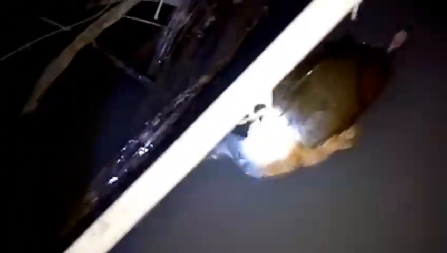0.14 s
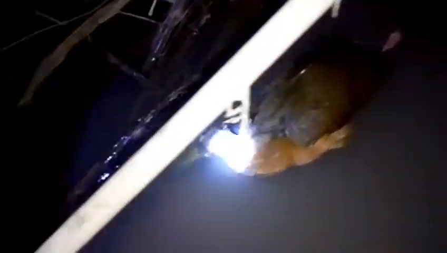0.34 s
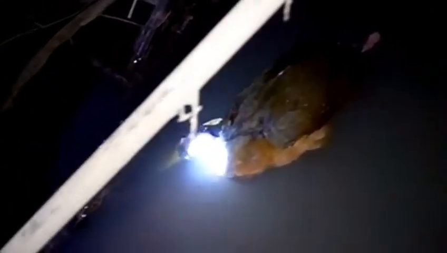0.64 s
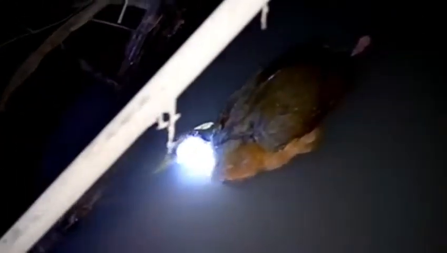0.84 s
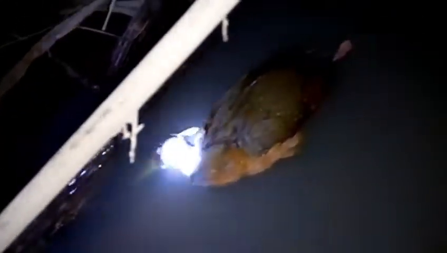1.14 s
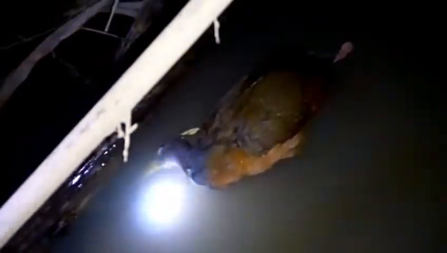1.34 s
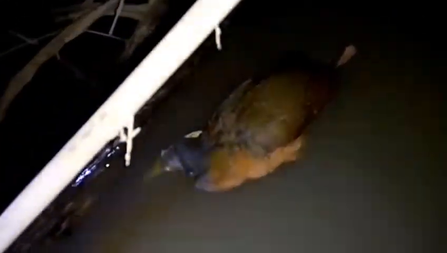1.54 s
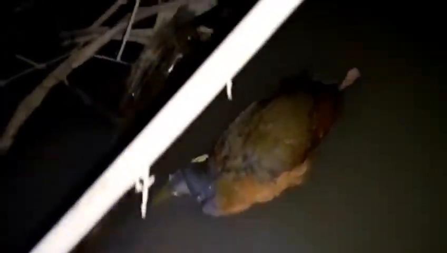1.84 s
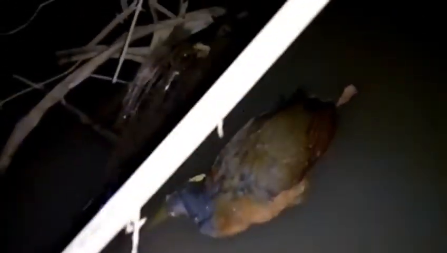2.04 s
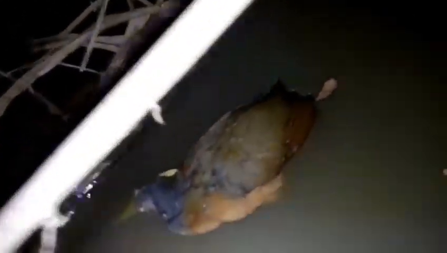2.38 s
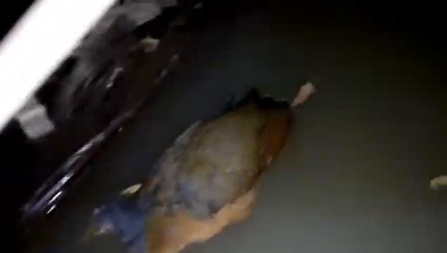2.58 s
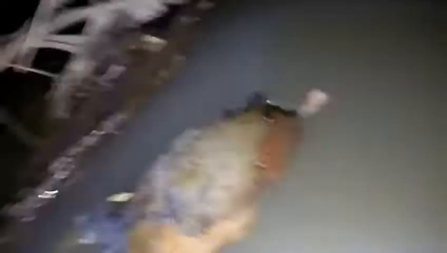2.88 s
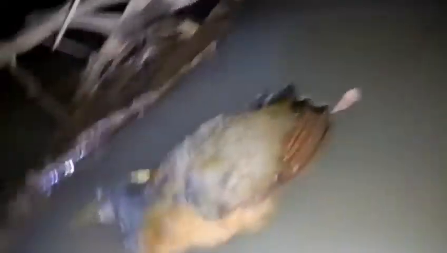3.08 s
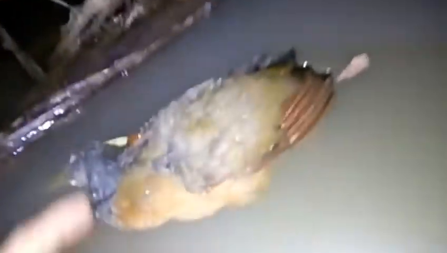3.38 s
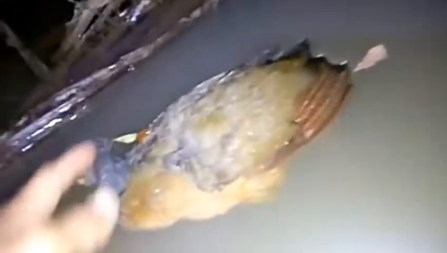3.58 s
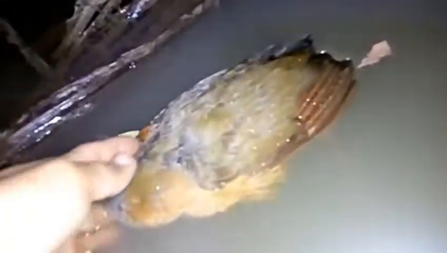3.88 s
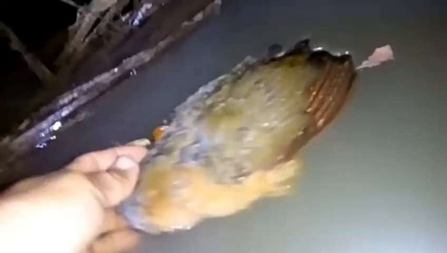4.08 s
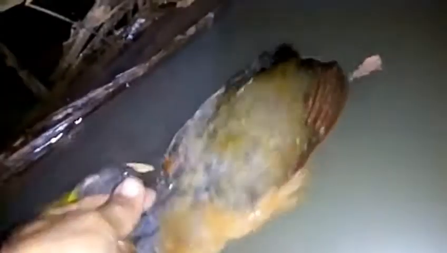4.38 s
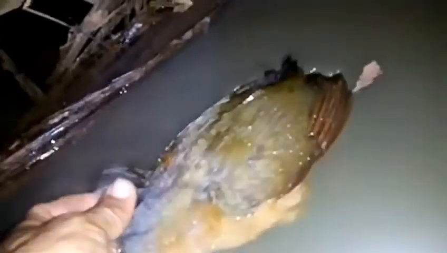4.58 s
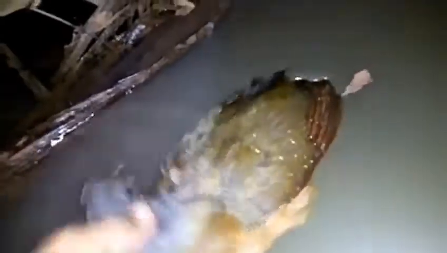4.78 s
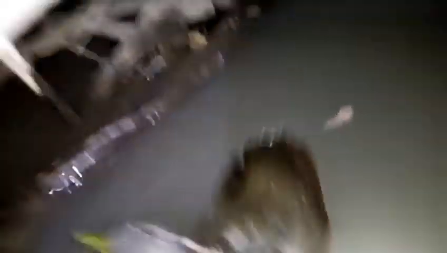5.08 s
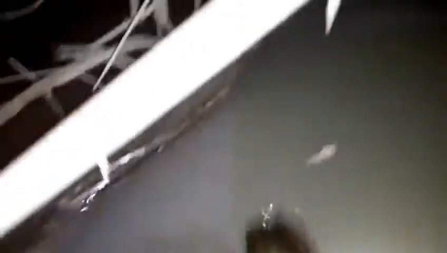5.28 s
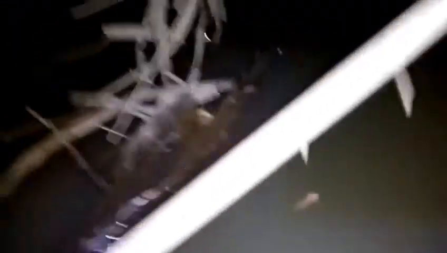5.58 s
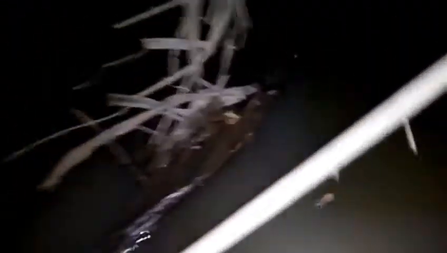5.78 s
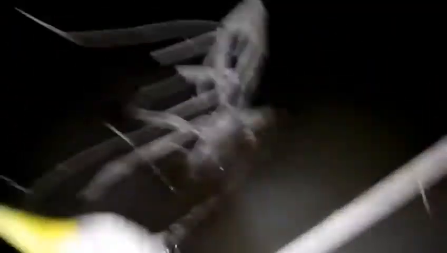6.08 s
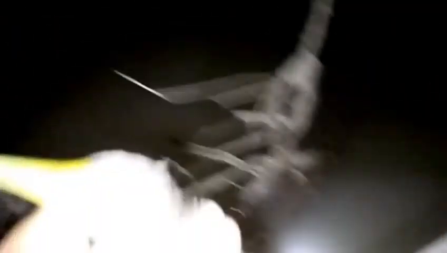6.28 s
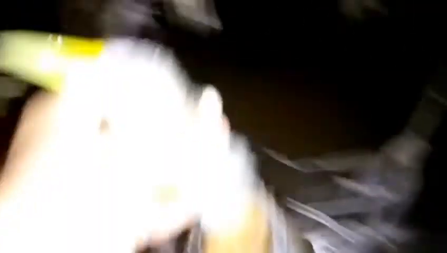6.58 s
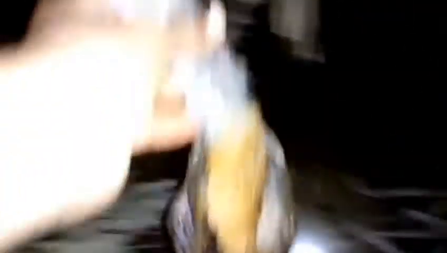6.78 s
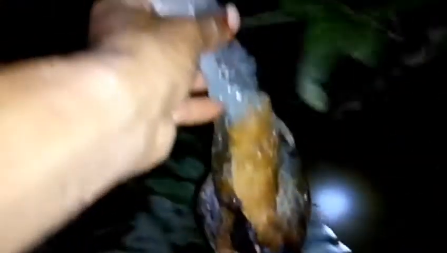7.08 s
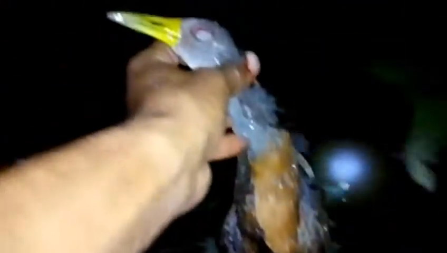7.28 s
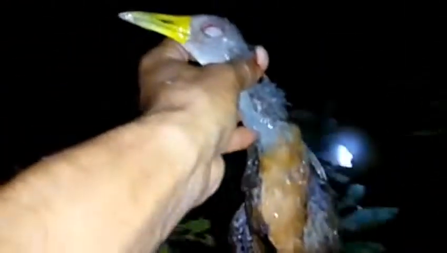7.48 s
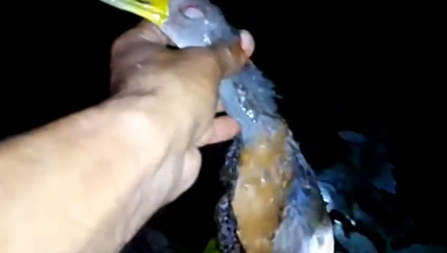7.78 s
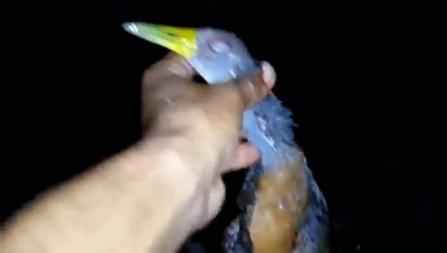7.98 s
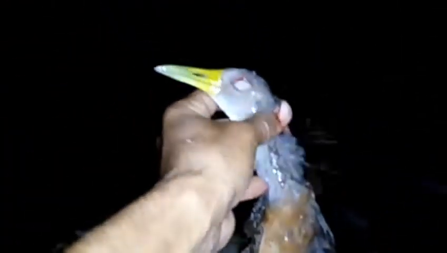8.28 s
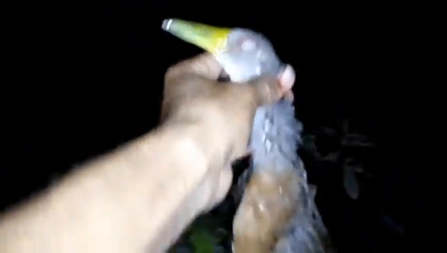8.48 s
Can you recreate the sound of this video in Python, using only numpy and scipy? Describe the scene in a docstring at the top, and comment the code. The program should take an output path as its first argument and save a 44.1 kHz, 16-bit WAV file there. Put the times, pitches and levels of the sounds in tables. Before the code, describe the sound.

Loud, continuous insect shimmer dominates, two high layers with a fast buzz and a few trilling crickets. Over it come small close details: a few early plops and twig ticks, a quiet gap, hard dry clicks as a hand reaches in, then a sharp knock, droplets, bubbling drips and leaf scrapes as a wet bird leaves the creek. A single small handheld microphone, mono, open night air, little echo.

```python
"""Beside a still creek at night, two insect choruses chirr in the trees: filtered noise, throbbing or fluttering.
A few closer crickets sing as sine tones gated by their wing strokes.
Someone reaches through wet stems and lifts a dead bird out of the water: leaves swish and twigs snap as shaped
noise, drops plink and a few very short knocks join the snaps as decaying sines, runoff trickles as tiny bubbles.
One small microphone hears it all, over a faint low rumble and an even hiss of shaped noise."""
import sys
import numpy as np
from scipy import signal
from scipy.fft import rfft, irfft, next_fast_len
from scipy.io import wavfile
from scipy.ndimage import uniform_filter1d, map_coordinates

SR = 44100
rng = np.random.default_rng(int(sys.argv[2]) if len(sys.argv) > 2 else 0)


def digitize_waveform(pressure):
    """Quantize a signal to 16-bit integers and store it at the path in sys.argv[1].

    Rows of a 2-D input are taken as channels; values are limited to [-1, 1].
    """
    field = np.atleast_2d(pressure).T
    bounded = np.clip(field, -1, 1)
    quanta = np.round(bounded * 32767).astype(np.int16)
    wavfile.write(sys.argv[1], SR, quanta)


N = 381024

# All table levels are relative: each source may apply a trim or add scatter.
# slow swell of the low chorus and its upper skirt: time_s, level_db, skirt_level_db
LOW_SWELL = [(0.0, -42.5, -50.5), (0.89, -43.5, -53), (1.28, -47, -54), (2.76, -43, -53), (4.76, -45, -55),
             (5.29, -42.5, -52.5), (6.45, -44.5, -55), (6.86, -45, -49.5), (7.43, -48, -59.5),
             (7.92, -46.5, -57), (8.2, -46, -51.5), (8.64, -46, -54.5)]
# slow swell of the high chorus: time_s, level_db
HIGH_SWELL = [(0, -41.5), (1.3, -43.5), (1.8, -41.5), (3.3, -41.5), (4.3, -45.5), (5.1, -43.5), (6.9, -43),
              (7.3, -44.5), (8.64, -42.5)]
# spectral densities of the low chorus, its skirt, the high chorus and its overtones: frequency_hz, density_db
LOW_SPECTRUM = [(2500, -46.5), (2900, -26), (3200, -19), (3450, -5.5), (3680, 3), (3930, 1.5), (4150, -3),
                (4500, -23), (5200, -36), (6500, -76)]
SKIRT_SPECTRUM = [(3600, -49.5), (4300, 8.5), (4600, 3.5), (5100, 1.5), (5500, -6.5), (6000, -8.5),
                  (6800, -45)]
HIGH_SPECTRUM = [(5200, -61), (5600, -16), (5820, -15), (6050, -11.5), (6200, -10.5), (6370, 0.5),
                 (6620, 0), (6950, -2.5), (7400, -11), (8000, -26.5), (8600, -50.5), (9500, -85)]
OVERTONE_SPECTRUM = [(12500, -42), (13800, -23), (14600, -1), (15300, -3), (15800, -5.5)]
# nearer crickets: pitch_hz, wing_strokes_per_s, chirps_per_s, level_db
CRICKET_VOICES = [(3915, 41.7, 0.37, -61), (6380, 49.6, 2, -55), (6660, 81, 3.7, -50.5),
                  (5795, 59, 2.6, -64.5)]
# drops falling into the creek, and a few very short pitched knocks that sound with the snaps:
# start_s, level_db, pitch_hz, t60_s, glide_octaves_per_s
PLINKS_AND_KNOCKS = [(.642, -46, 1300, .069, 2), (0.669, -41, 1260, 0.035, 2), (.718, -52, 720, 0.055, -4),
                     (1.194, -40, 1160, 0.027, 16), (1.86, -50, 2070, .05, -5),
                     (3.035, -34.5, 1360, 0.0058, 4), (3.0712, -17, 1380, 0.0064, -2),
                     (3.2715, -25.5, 2040, 0.014, -6), (3.272, -30, 1180, 0.015, -3),
                     (3.5, -48, 1053, 0.14, 6.5), (3.587, -36, 1470, .025, 4), (3.65, -36.5, 1290, .028, 5),
                     (3.807, -29.5, 1120, 0.021, 5), (4.694, -28.5, 1040, 0.0079, -6),
                     (5.224, -10, 1080, .0029, 3), (5.337, -46, 1330, .03, 3),
                     (5.602, -33.5, 775, 0.02, 16), (6.094, -29.5, 1277, 0.082, 18),
                     (6.149, -32.5, 2670, .03, 6), (6.2899, -26.5, 1383, .037, -7.5),
                     (6.322, -27, 1840, 0.0071, 2), (6.65, -41, 1425, .064, -3.5),
                     (6.749, -44.5, 2230, .05, 3), (6.955, -36, 2390, .02, 13),
                     (7.053, -29.5, 1600, 0.033, -7), (7.1734, -44, 1020, 0.12, 5),
                     (7.277, -44, 1780, 0.043, -10)]
# twig snaps and droplet ticks: start_s, crack_db, rasp_db, knock_db, t60_s
SNAP_EVENTS = [(0.09, -43.5, -63, -69, 0.0079), (1.092, -36.5, -32, -54, 0.01),
               (1.097, -39, -35, -49.5, 0.074), (1.1335, -30, -22, -36, 0.016),
               (2.442, -64, -41, -51, .0087), (3.0704, -43, -50, -31, 0.0078),
               (3.405, -48, -46, -42, 0.008), (3.5763, -34.5, -25, -38, 0.013),
               (3.656, -46, -53, -41.5, .008), (3.773, -72, -48, -45, .03), (4.696, -47, -53, -37, .0066),
               (5.175, -68, -60, -40, 0.0069), (5.225, -42.5, -54, -31, 0.0055),
               (5.551, -72, -47, -39, 0.028), (5.587, -50.5, -48, -47, 0.011),
               (6.049, -49, -60, -65, .0062), (6.111, -40.5, -50, -50, 0.0096),
               (6.36, -39.5, -60, -70, 0.0055), (6.4492, -44, -27, -63, 0.013),
               (7.393, -42, -50, -51, .0051)]
# strokes through wet leaves: peak_s, half_width_s, slosh_db, bubble_hz, scrape_db, hiss_db
LEAF_STROKES = [(0.667, 0.026, -50, 1420, -44, -72), (0.692, 0.0063, -54, 950, -50, -64.5),
                (.9, 0.026, -59.5, 2100, -60, -67), (0.989, 0.041, -55, 1970, -46, -53.5),
                (1.135, 0.028, -61, 1730, -69, -52), (2.448, 0.018, -55, 1580, -47, -81),
                (3.12, 0.087, -61.5, 1590, -52.5, -86), (3.31, 0.088, -61.5, 1800, -65, -83.5),
                (3.6, 0.1, -59.5, 1620, -62, -65), (3.815, 0.024, -52.5, 1170, -74, -89),
                (5.159, 0.028, -55, 1860, -53, -82), (5.598, 0.039, -55.5, 547, -62, -75),
                (5.635, 0.036, -50, 1480, -48, -66), (6.439, 0.031, -84, 2000, -64, -63.5),
                (6.802, 0.016, -63, 910, -38.5, -67), (7.002, 0.07, -61.5, 2320, -50, -70),
                (7.057, 0.018, -45, 2060, -38.5, -57), (7.108, 0.01, -43, 1960, -38.5, -64),
                (7.41, 0.036, -56, 1760, -52, -72)]
# spectral densities of scraped stems, hissing leaf blades and knocked wood: frequency_hz, density_db
STEM_SPECTRUM = [(500, -44), (2000, -45), (3200, -3), (4400, -7), (5300, 0), (6600, 8), (8000, -9),
                 (10000, -26), (15000, -49)]
BLADE_SPECTRUM = [(3000, -31), (7000, 3.5), (9500, 3.5), (12500, -4.5), (15000, 7.5), (16000, 3.5)]
WOOD_SPECTRUM = [(200, -9), (700, -23), (1500, 5), (2700, -2), (4000, -1), (8000, -31)]
# spectral density of the wash of displaced water: frequency_hz, density_db
WASH_SPECTRUM = [(100, -23), (320, 2.0), (550, -1.0), (2600, 5.5), (5000, -31.0)]
# water running off disturbed stems and feathers: start_s, length_s, level_db
RUNOFF_SPELLS = [(.95, 0.24, -63.5), (2.42, .1, -74), (2.94, 0.028, -70), (3.3, .55, -69.5),
                 (5.047, 0.27, -69.5), (5.563, 1.21, -68.5), (6.964, 0.38, -67.5), (7.69, 0.047, -75)]
# soft bumps of the hand that holds the microphone: peak_s, level_db
HAND_BUMPS = [(1.52, -65.5), (2.05, -69.5), (2.46, -62), (2.85, -68), (3.08, -63.5), (4.7, -63),
              (5.18, -64), (6.58, -64), (6.7, -63.5)]
# spectral densities of the rumble and of the faint hiss: frequency_hz, density_db
RUMBLE_SPECTRUM = [(20, -12.5), (36, -14.5), (75, -2), (140, 0), (260, -7), (500, -14), (1500, -33)]
AIR_SPECTRUM = [(60, -22.5), (300, -9), (600, -9.5), (1200, -13), (2600, -15.5), (8500, -23),
                (10300, -20.5), (11500, -39.5), (16000, -32)]

LOW_STROKES_PER_S = 41.7  # mean wing-stroke rate of the low chorus
OVERTONE_DB = -32.5  # relative to the high chorus
RUNOFF_RISE_DB_PER_S, RUNOFF_FALL_DB_PER_S = 71, 135  # how fast a spell builds and dries up
TICKS_PER_S, TICK_DB = 42, -14  # specks of water hitting leaves, relative to the running water
RUMBLE_DB, RUMBLE_SWELL_DB, RUMBLE_LUMP_DB = -70, .5, 1.8  # level, slow swells, quick lumps
BUMP_WIDTH_S = 0.029
TOP_HZ = 15650  # band limit of the recorder


def amp(db):
    """Logarithmic level: 20 dB is a tenfold gain in amplitude."""
    return 10 ** (np.asarray(db) / 20)


def unit(x):
    """Power normalisation: scale to rms 1."""
    return x / np.sqrt(np.mean(x ** 2) + 1e-20)


def clock():
    """Sampled time: seconds at each sample."""
    return np.arange(N) / SR


def curves(rows):
    """Linear interpolation: one curve for each column after the time."""
    times, *columns = np.transpose(rows)
    return [np.interp(clock(), times, column) for column in columns]


def wobble(rate):
    """Slow random modulation: a smooth curve with rate knots a second."""
    knots = rng.standard_normal(int(N * rate / SR) + 4)
    coarse = np.arange(0, N + 32, 32)
    smooth = map_coordinates(knots, [coarse * rate / SR])
    return np.interp(np.arange(N), coarse, smooth)


def coloured(x, spectrum):
    """Linear filtering: multiply the spectrum of x by a gain curve, then set rms 1."""
    size = next_fast_len(N + SR // 4)
    hz, db = np.transpose(spectrum)
    log_bins = np.log(np.fft.rfftfreq(size, 1 / SR) + 1)
    gain = amp(np.interp(log_bins, np.log(hz), db))
    return unit(irfft(rfft(x, size) * gain, size)[:N])


def noise(spectrum):
    """Stationary random sound: filtered Gaussian noise of rms 1."""
    return coloured(rng.standard_normal(N), spectrum)


def crackle(spectrum, clump_db):
    """Many tiny contacts: noise bunched into clumps of a few milliseconds."""
    clumps = amp(clump_db * wobble(450))
    return coloured(rng.standard_normal(N) * clumps, spectrum)


def thicket(x, t60, wet_db):
    """Multiple scattering: direct sound plus a decaying tail from trunks and leaves."""
    t = np.arange(SR // 2) / SR
    tail = rng.standard_normal(len(t)) * amp(-60 * t / t60)
    scattered = signal.fftconvolve(x, tail / np.linalg.norm(tail))[:N]
    return x + amp(wet_db) * scattered


def trill(rate, drift):
    """Periodic motion: phase in cycles, at a slightly unsteady rate per second."""
    return np.cumsum(rate * (1 + drift * wobble(3))) / SR + rng.random()


def bubbles(size, rate, centre_hz, spread, cycles):
    """Bubble resonance: a stream of decaying, rising tones at rms 1; spread scales octaves, cycles the decay."""
    draws = rng.random((int(rate * size / SR) + 1, 5))
    start = (draws[:, :1] * size).astype(int)
    t = np.arange(SR // 50) / SR
    octaves = spread * np.sum(draws[:, 1:4] - .5, axis=1, keepdims=True)
    hz = centre_hz * 2 ** octaves
    age = hz * t / cycles
    strength = amp(19.6 * draws[:, 4:])
    envelope = np.exp(-age) * (1 - np.exp(-2 * hz * t))
    rings = strength * envelope * np.sin(2 * np.pi * hz * t * (1 + 0.018 * age))
    places = start + np.arange(len(t))
    return unit(np.bincount(places.ravel(), rings.ravel(), size)[:size])


def swarm(spectrum, patchy_db):
    """Incoherent superposition: countless far singers blur into noise whose pitches swell and fade."""
    z = signal.stft(rng.standard_normal(N), nperseg=512)[2]
    field = uniform_filter1d(rng.standard_normal(z.shape), size=3, axis=0)  # across pitch
    field = uniform_filter1d(field, size=16, axis=1)  # across time
    patchy = signal.istft(z * amp(patchy_db * unit(field)), nperseg=512)[1][:N]
    return coloured(patchy, spectrum)


def choruses():
    """Amplitude modulation: the low chorus throbs with its wing strokes; the high one flutters irregularly."""
    low_db, skirt_db = curves(LOW_SWELL)
    throb = amp(1.0 * np.sin(2 * np.pi * trill(rate=LOW_STROKES_PER_S, drift=0.019)))
    low = amp(low_db - .5) * unit(throb * swarm(LOW_SPECTRUM, patchy_db=0.5))
    skirt = amp(skirt_db - 1.0) * swarm(SKIRT_SPECTRUM, patchy_db=1.2)
    flutter = amp(curves(HIGH_SWELL)[0] + 0.62 * wobble(40) + 0.7 * wobble(4.4))
    high = swarm(HIGH_SPECTRUM, patchy_db=2.1) + amp(OVERTONE_DB) * noise(OVERTONE_SPECTRUM)
    return low + skirt + flutter * high


def crickets():
    """Stridulation: each wing closure sounds one syllable that sags in pitch; syllables swell into chirps."""
    song = np.zeros(N)
    for hz, strokes, chirps, db in CRICKET_VOICES:
        stroke = trill(rate=strokes, drift=0.01) % 1
        syllable = np.sin(np.pi * np.minimum(stroke / 0.99, 1)) ** 2
        chirp = amp(7 * np.sin(2 * np.pi * trill(rate=chirps, drift=0.45)) + 2.25 * wobble(1.243))
        pitch = hz * (1 - .025 * (stroke - 1 / 3) + 0.00697 * wobble(150) + .005 * wobble(4))
        tone = np.sin(2 * np.pi * np.cumsum(pitch) / SR)
        song += amp(db) * unit(syllable * chirp * tone)
    return amp(-6.0) * thicket(song, t60=0.48, wet_db=7.0)


def plinks_and_knocks():
    """Damped resonance: bubbles trapped by drops, and a few short knocks, ring with a gliding pitch and die away."""
    rings = np.zeros(N + SR)
    t = np.arange(SR // 8) / SR
    for s, db, hz, t60, glide in PLINKS_AND_KNOCKS:
        phase = 2 * np.pi * np.cumsum(hz * 2 ** (glide * t)) / SR
        attack = 1 - np.exp(-t / min(t60 / 25, .0006))
        ring = amp(db - 3.0 - 60 * t / t60) * attack * np.sin(phase)
        # so small a source radiates little below its own pitch
        highpass = signal.butter(N=8, Wn=.6 * hz, btype="high", fs=SR, output="sos")
        rings[round(s * SR):][:len(t)] += signal.sosfilt(highpass, ring)
    return thicket(rings[:N], t60=0.18, wet_db=-14.5)


def snaps():
    """Impulsive excitation: a twig or droplet gives a fine crack, a dry rasp and a duller knock."""
    levels = np.zeros((3, N + SR))
    t = np.arange(SR // 8) / SR
    for s, crack_db, rasp_db, knock_db, t60 in SNAP_EVENTS:
        fade = amp(-60 * t / t60) * (1 - np.exp(-t / .0002))
        levels[:, round(s * SR):][:, :len(t)] += amp([[crack_db], [rasp_db], [knock_db]]) * fade
    crack, rasp, knock = levels[:, :N]
    dry_snaps = crack * noise(BLADE_SPECTRUM) + rasp * noise(STEM_SPECTRUM) + knock * noise(WOOD_SPECTRUM)
    return thicket(dry_snaps, t60=.18, wet_db=-15)


def leaves():
    """Friction and stirring: each stroke stirs up bubbles, scrapes stems and hisses over leaf blades."""
    fizz, stir, scrape, hiss = np.zeros((4, N))
    t = clock()
    for s, width, slosh_db, bubble_hz, scrape_db, hiss_db in LEAF_STROKES:
        near = np.abs(t - s) < .2
        stroke = np.exp(-.5 * ((t[near] - s) / width) ** 2)
        stirred = bubbles(size=near.sum(), rate=600, centre_hz=bubble_hz, spread=0.705, cycles=2.9)
        fizz[near] += amp(slosh_db) * stroke * stirred
        stir[near] += amp(slosh_db) * stroke
        scrape[near] += amp(scrape_db) * stroke
        hiss[near] += amp(hiss_db) * stroke
    # the displaced water adds a broad, dull wash under the bubbles
    wash = stir * crackle(WASH_SPECTRUM, clump_db=1)
    slosh = amp(-2.5) * fizz + amp(-7.5) * wash
    return slosh + scrape * crackle(STEM_SPECTRUM, clump_db=4.0) + hiss * crackle(BLADE_SPECTRUM, clump_db=4)


def runoff():
    """Exponential growth and decay: each spell of running water builds, holds and dries up."""
    flow, t = np.zeros(N), clock()
    for s, length, db in RUNOFF_SPELLS:
        rise_db = RUNOFF_RISE_DB_PER_S * np.maximum(s - t, 0)
        fall_db = RUNOFF_FALL_DB_PER_S * np.maximum(t - s - length, 0)
        flow += amp(db - rise_db - fall_db)
    return flow


def trickle():
    """Bubble resonance: running water rings a stream of tiny bubbles; specks of it tick on the leaves."""
    stream = bubbles(size=N, rate=540, centre_hz=2030, spread=0.508, cycles=18.0)
    specks = bubbles(size=N, rate=TICKS_PER_S, centre_hz=1900, spread=0.88, cycles=0.84)
    return runoff() * (stream + amp(TICK_DB) * specks)


def air():
    """Broadband noise: a lumpy low rumble that swells with each bump of the hand, and a faint even hiss."""
    t = clock()
    bumps = sum(amp(db) * np.exp(-.5 * ((t - s) / BUMP_WIDTH_S) ** 2) for s, db in HAND_BUMPS)
    rumble = amp(RUMBLE_DB + RUMBLE_SWELL_DB * wobble(2.26) + RUMBLE_LUMP_DB * wobble(14))
    # independent powers add
    return np.hypot(rumble, bumps) * noise(RUMBLE_SPECTRUM) + amp(-69.5) * noise(AIR_SPECTRUM)


def scene():
    """Linear superposition: all sources add, the same in both channels."""
    mono = choruses() + crickets() + plinks_and_knocks() + snaps() + leaves() + trickle() + air()
    return np.array([mono, mono])


def record(dry):
    """Band limitation: the recorder keeps nothing above its band limit."""
    size = next_fast_len(N + SR // 4)
    passband = np.fft.rfftfreq(size, 1 / SR) < TOP_HZ
    return irfft(rfft(dry, size) * passband, size)[:, :N]


dry = scene()
out = record(dry)
digitize_waveform(out)
```